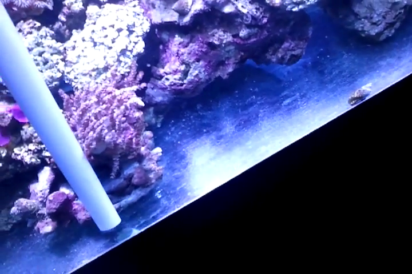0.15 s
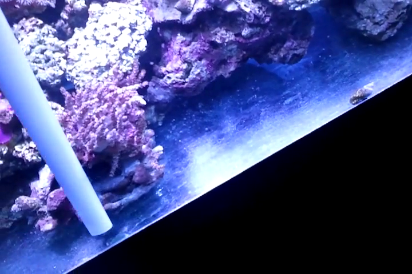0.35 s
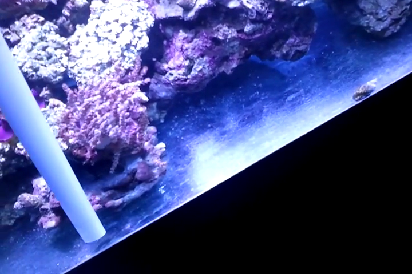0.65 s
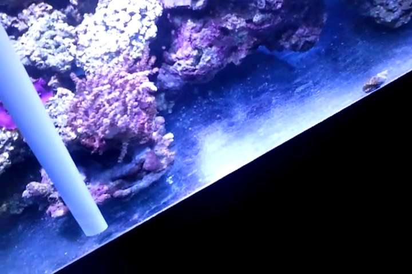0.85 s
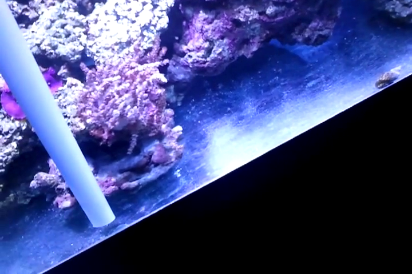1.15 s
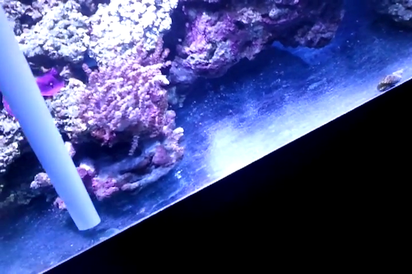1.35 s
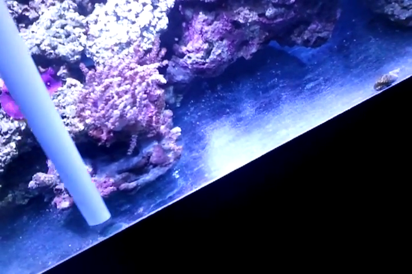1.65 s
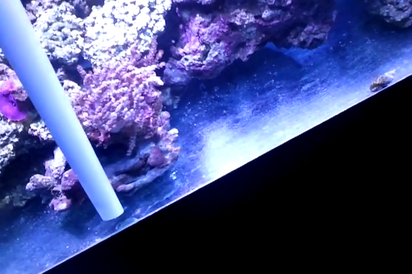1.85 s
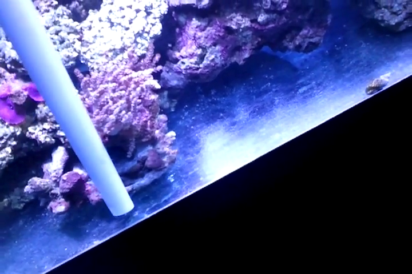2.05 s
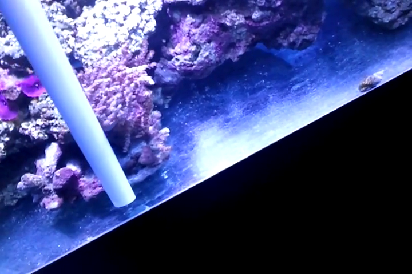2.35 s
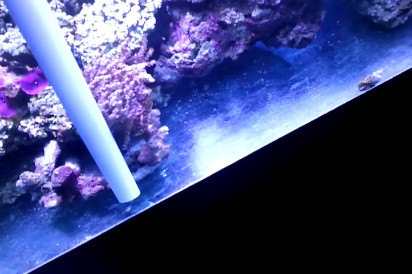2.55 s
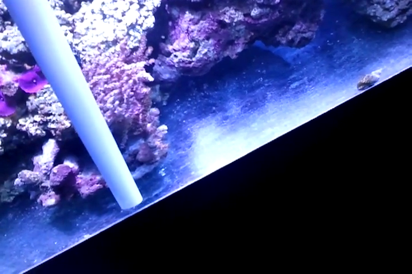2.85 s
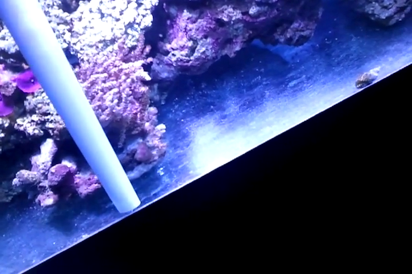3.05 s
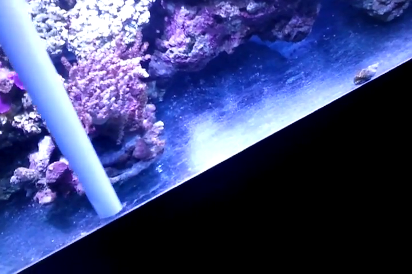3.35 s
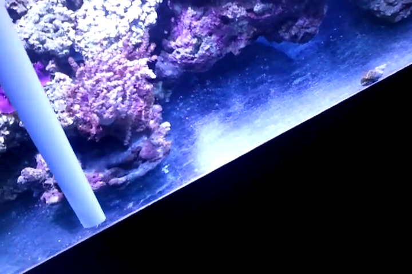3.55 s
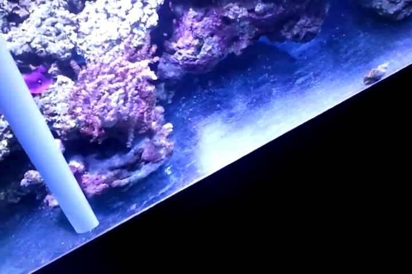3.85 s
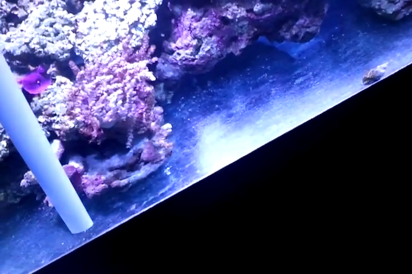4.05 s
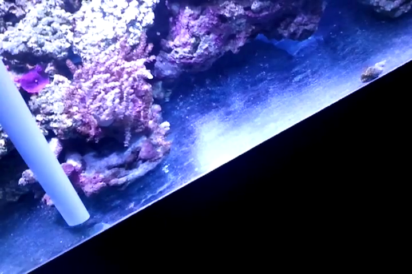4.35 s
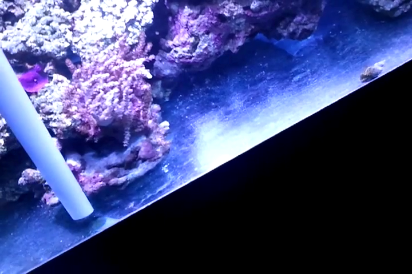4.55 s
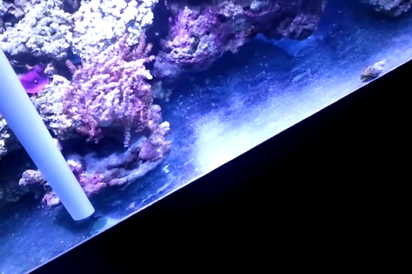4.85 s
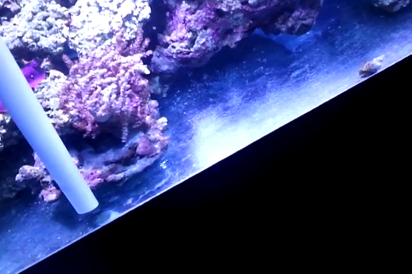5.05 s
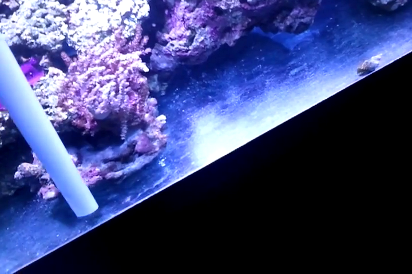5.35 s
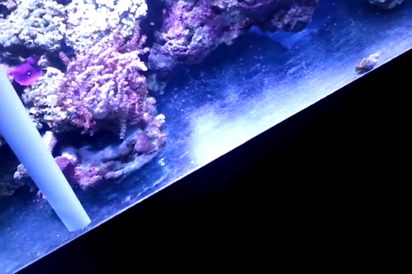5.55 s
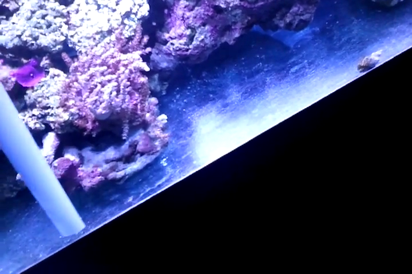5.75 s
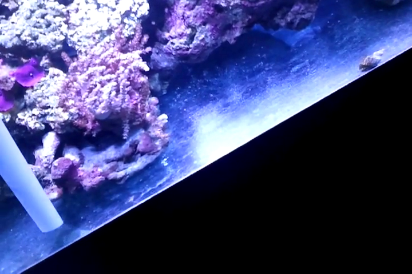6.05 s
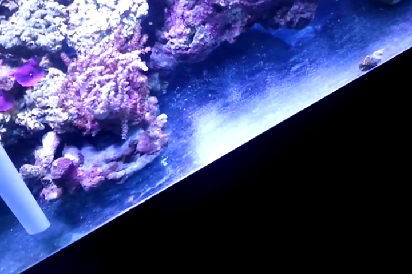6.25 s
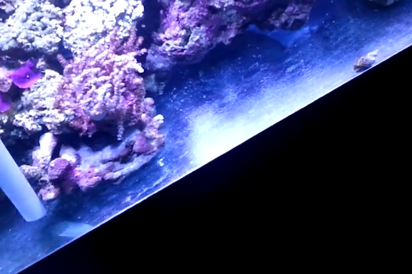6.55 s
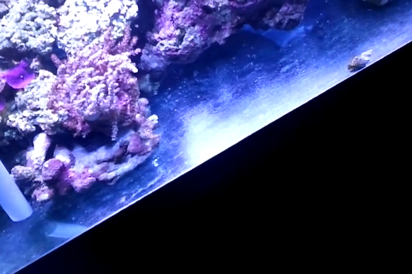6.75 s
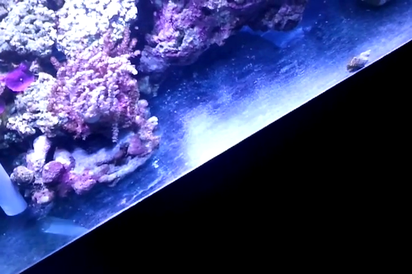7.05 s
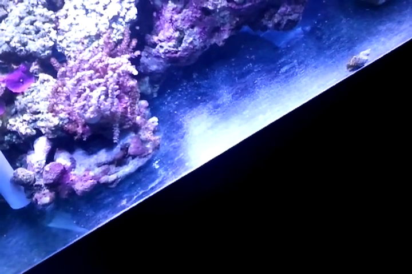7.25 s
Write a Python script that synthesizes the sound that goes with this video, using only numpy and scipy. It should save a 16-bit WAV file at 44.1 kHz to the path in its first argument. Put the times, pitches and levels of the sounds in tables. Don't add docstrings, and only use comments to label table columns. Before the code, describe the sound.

Water drains steadily from an aquarium through a tube, trickling and bubbling over a pump hum, with handling bumps and one firm thump near the end.

```python
import sys
import numpy as np
from scipy import signal
from scipy.fft import rfft, irfft
from scipy.io import wavfile
from scipy.ndimage import uniform_filter1d

SR = 44100
rng = np.random.default_rng(int(sys.argv[2]) if len(sys.argv) > 2 else 0)


def how_loud(loudness_db):
    steps = np.asarray(loudness_db, float) / 20
    return 10 ** steps


def transcribe(u):
    v = np.clip(np.atleast_2d(u).T, -1, 1)
    q = np.round(v * 32767).astype(np.int16)
    wavfile.write(sys.argv[1], SR, q)


N = 325670


def evened(x):
    return x / np.sqrt(np.mean(x ** 2) + 1e-20)


def curve(rows):
    return np.interp(np.arange(N) / SR, *np.transpose(rows))


def add(mix, start_s, sound):
    part = mix[round(start_s * SR):][:len(sound)]
    part += sound[:len(part)]


def bandpass(x, low_hz, high_hz):
    sos = signal.butter(2, [low_hz, high_hz], "bandpass", fs=SR, output="sos")
    return signal.sosfilt(sos, x)


def wander(hz, count):
    rate = 40
    steps = int(N / SR * rate) + 2
    spectrum = rfft(rng.standard_normal((count, steps)))
    spectrum /= 1 + (np.fft.rfftfreq(steps, 1 / rate) / hz) ** 2
    slow = irfft(spectrum, steps)
    at = np.arange(N) / SR * rate
    return [np.interp(at, np.arange(steps), evened(v - v.mean())) for v in slow]


def ping(db, hz, cycles, rise=0.0067):
    t = np.arange(int(cycles / hz * SR) + 8) / SR
    age = t * hz / cycles
    onset = 1 - np.exp(-t * hz / 0.6)
    return how_loud(db - 60 * age) * onset * np.sin(2 * np.pi * hz * t * (1 + rise * age))


# pitch_hz [Hz], level_db [dB per Hz]
WASH_SPECTRUM = [(22, -5), (45, -8), (80, -9), (110, -4), (190, -0.2), (280, 0), (350, -8), (470, -6.5),
                 (680, -9.5), (900, -7), (1300, -17.5), (1800, -15.5), (3000, -21), (6200, -24)]
# pitch_hz [Hz], width_hz [Hz], level_db [dB]
ROOM_MODES = [(107, 22, 0.5), (165, 11, 4.5), (216, 13, 3), (270, 11, -3), (261, 14, -3.5),
              (465.6, 17, 7.5), (591, 14, 4.5), (626, 3.3, -1.5), (722, 24, 3), (847, 52, -4.5),
              (912, 7.7, 2.5), (914, 20, -2.5), (927, 11, -2.5), (1050, 9.1, 1.5), (1206, 17, 3.5),
              (1306, 140, 5), (1360, 16, 1), (2680, 290, 3)]
# time_s [s], level_db [dB]
STREAM_STRENGTH = [(0, -0.7), (.8, -0.55), (1.3, -0.5), (1.7, -0.5), (2.3, -0.5), (3.05, 0), (3.5, -1),
                   (4.5, -1), (5.5, -0.5), (6.2, 0.5), (6.6, -1.7), (7.39, -2)]
WASH_DB = -37


def wash():
    frames, hz = N // 128 + 6, np.fft.rfftfreq(512, 1 / SR)
    real, imag, patches = rng.standard_normal((frames, 257, 3)).T
    patches = uniform_filter1d(patches, size=14, axis=0)
    patches = evened(uniform_filter1d(patches, size=12, axis=1))
    flicker = evened(uniform_filter1d(rng.standard_normal(frames), size=8))
    field_db = np.clip(hz / 4000, .2, 1)[:, None] * (.8 * patches + .8 * flicker)
    white = signal.istft((real + 1j * imag) * how_loud(field_db), nperseg=512, noverlap=384)[1][:N]
    fine = np.fft.rfftfreq(N, 1 / SR)
    modes_db = sum(db / (1 + (2 * (fine - mode_hz) / width) ** 2) for mode_hz, width, db in ROOM_MODES)
    f, level_db = np.transpose(WASH_SPECTRUM)
    colour_db = np.interp(np.log(fine + 1), np.log(f + 1), level_db) + modes_db
    colour = how_loud(colour_db) * (fine > 12) * (fine < 8000)
    return how_loud(WASH_DB) * evened(irfft(rfft(white) * colour, N)) * how_loud(curve(STREAM_STRENGTH))


# start_s [s], level_db [dB peak], pitch_hz [Hz], t60_s [s]
BUBBLES = [(.5362, -37, 3920, 0.019), (.6049, -35, 3570, .018), (.8283, -38, 3760, .02),
           (.9645, -30, 2210, 0.019), (1.145, -35, 2290, 0.026), (1.2115, -35, 2250, 0.015),
           (1.476, -40, 2270, 0.032), (1.5246, -39, 3600, .018), (1.6374, -37, 6770, .028),
           (1.645, -34, 2360, .02), (1.722, -32, 3700, .02), (1.743, -32.5, 2290, 0.024),
           (1.809, -41, 2510, .028), (1.829, -41, 3330, 0.034), (1.608, -41, 3700, .03),
           (3.565, -39, 2270, .025), (3.531, -37, 2650, .015), (3.485, -38, 2580, .015),
           (3.47, -36, 3700, .02), (6.7, -37, 2100, .018), (2.0325, -34, 2250, .015),
           (2.045, -37, 1940, .015), (2.0555, -32.5, 2740, 0.011), (2.48, -36, 2770, .028),
           (3.073, -41, 3630, .02), (3.1, -35, 1940, .018), (3.122, -38, 2550, .028),
           (3.3173, -30.5, 4140, .017), (3.3676, -35, 3770, .022), (3.6738, -34, 3740, .018),
           (3.697, -40, 4130, .018), (3.7065, -37, 3670, .018), (3.9005, -37, 3670, .018),
           (3.749, -32.5, 2260, 0.028), (3.994, -36.5, 6720, .015), (4.44, -33, 2170, .018),
           (4.451, -35, 2480, 0.022), (4.5233, -32, 2680, .018), (4.7175, -40, 3530, .015),
           (4.8945, -37, 2770, 0.014), (5.498, -40, 4890, .028), (5.6282, -39.5, 3420, 0.02),
           (5.733, -33.5, 2770, .022), (6.25, -34.5, 1890, .028), (6.257, -40, 6000, 0.025),
           (6.6985, -41.5, 3580, .015)]
# start_s [s], level_db [dB peak], pitch_hz [Hz]
GULPS = [(1.705, -36, 1106), (1.814, -38, 1420), (1.859, -34, 1267), (1.963, -40.5, 1360),
         (2.718, -40, 1216), (3.078, -31, 1020), (3.309, -33, 1240), (3.441, -34.5, 1265),
         (3.69, -35, 1276), (4.13, -32.5, 1250), (4.249, -35, 1280), (4.278, -31, 1250), (5.552, -33, 1240),
         (5.897, -35, 1220)]
BUBBLE_DB, GULP_CYCLES = -2.5, 77


def bubbles():
    out = np.zeros(N)
    for start_s, db, hz, t60_s in BUBBLES:
        add(out, start_s, ping(db + BUBBLE_DB, hz, hz * t60_s))
    for start_s, db, hz in GULPS:
        add(out, start_s, ping(db, hz, GULP_CYCLES))
    return out


# start_s [s], level_db [dB peak], pitch_hz [Hz]
SPLASHES = [(0.1469, -28, 3520), (0.1568, -35, 5730), (1.4144, -29, 4320), (1.47, -26.5, 4420),
            (1.5722, -27, 6100), (1.6652, -32.5, 5950), (1.506, -33.5, 6330), (1.652, -31.5, 6280),
            (2.1215, -30, 7250), (2.3924, -35.5, 6150), (2.5126, -32, 6400), (3.022, -34, 6000),
            (3.0948, -26, 6480), (3.5708, -35.5, 5700), (3.579, -28, 6120), (3.729, -28.5, 7220),
            (1.8795, -32.5, 6430), (3.992, -35, 5030), (4.284, -28.5, 5210), (4.3835, -29, 5650),
            (4.4145, -33, 4780), (4.8536, -31, 5460), (4.8554, -30.5, 3650), (4.8927, -28, 5840),
            (5.396, -38, 3620), (5.497, -29.5, 6050), (5.5247, -26.5, 6530), (5.5925, -26.5, 6440),
            (5.805, -30, 4660), (6.062, -33.5, 3930), (6.2538, -42, 4970), (6.5157, -29, 6730),
            (6.8156, -27.5, 6400),
            (0.973, -37.5, 5000), (3.1767, -35, 4200), (4.149, -32.5, 4500), (4.579, -34, 4440),
         (4.744, -39, 6640), (5.3958, -32, 3000), (6.759, -38, 6040), (0.8635, -31.5, 5880),
         (5.72, -32.5, 6330), (6.9516, -30, 4100), (7.029, -25, 6230),
            (.042, -35, 4700), (.171, -35, 3950), (.826, -39, 6630), (.993, -35, 6770),
               (1.416, -35, 3570), (1.419, -35.5, 6370), (1.479, -34, 3510), (1.57, -38.5, 4380),
               (1.582, -34, 6300), (1.653, -35, 4510), (2.222, -31, 7250), (2.314, -36, 6880),
               (3.132, -36, 4700), (3.139, -35, 7000), (3.377, -37, 5070), (3.656, -30, 7300),
               (3.674, -38, 4820), (3.74, -34, 7000), (3.961, -30.5, 7380), (3.992, -37.5, 5870),
               (4.282, -34, 4070), (4.293, -38.5, 3300), (4.464, -34, 6760), (4.854, -33, 7080),
               (4.866, -36, 3270), (4.866, -37, 5500), (5.201, -37, 6640), (5.23, -34.5, 4920),
               (5.267, -40, 5830), (5.407, -34, 3630), (5.522, -26, 7000), (5.738, -36, 6060),
               (5.816, -35, 7200), (6.106, -35, 4010), (6.137, -36.5, 6640), (6.154, -37, 3880),
               (6.268, -34, 4890), (6.827, -39, 5510), (6.961, -37, 5070), (7.04, -31, 6650)]
RING_T60_S, RING_DB, CLICK_DB = 0.0058, -5.5, -4.5
BAND_LOW, BAND_HIGH = .8, 1.16


def splashes():
    out, click = np.zeros(N), signal.unit_impulse(400)
    for start_s, db, hz in SPLASHES:
        snap = bandpass(click, hz * BAND_LOW, hz * BAND_HIGH)
        add(out, start_s, how_loud(db + CLICK_DB) * snap / abs(snap).max())
        add(out, start_s, ping(db + RING_DB, hz, hz * RING_T60_S))
    return out


def fizz(per_s=85, count=24):
    out = np.zeros(N)
    struck = rng.random(N) < per_s / SR
    size = how_loud(4.5 * np.minimum(rng.exponential(1, N), 2.1)) * struck
    kind = rng.integers(0, count, N)
    cycles = rng.choice([4, 10, 30], count)
    for k, hz in enumerate(np.geomspace(1100, 7000, count)):
        out += signal.oaconvolve(size * (kind == k), ping(-49.0, hz, cycles[k]))[:N]
    return out


# delay_s [s], level_db [dB]
ECHOES = [(.0012, -5), (.0023, -4), (.0036, -6), (.0075, -14), (.012, -4.5), (.0155, -10), (.021, -11),
          (.027, -12)]


def room(x, t60_s=.22, tail_db=-5.5):
    taps = np.zeros(SR // 4)
    at = np.arange(300, len(taps) - 22, 22)
    at = at + rng.integers(0, 22, len(at))
    taps[at] = rng.choice([-1., 1.], len(at)) * how_loud(-60 * at / SR / t60_s)
    taps *= how_loud(tail_db) / np.linalg.norm(taps)
    taps[0] = 1
    for delay_s, db in ECHOES:
        taps[round(delay_s * SR)] += how_loud(db)
    return signal.oaconvolve(x, taps)[:N]


# time_s [s], level_db [dB]
PUMP_SWELL = [(0, 3), (1.1, -0.5), (1.65, 0.5), (2.3, -0.5), (3.4, -2.5), (4.2, 2), (4.8, 2.5), (5.3, -1),
              (6.3, 0.5), (7.0, 4.5), (7.39, 0.5)]
# middle_s [s], depth_db [dB]
PUMP_NULLS = [(0.12, 14), (1.5, 16), (1.949, 5), (3.55, -1), (3.76, -2), (5.22, 12), (5.7, 4), (2.88, -5.5),
              (2.62, -2), (2.14, 3), (3.22, 5), (6.65, 5), (7.6, 2), (5.05, 9), (5.94, -4), (7.1, 6.5)]
NULL_S = 0.054


def pump_sway_db():
    t = np.arange(N) / SR
    dips_db = sum(db * np.exp(-((t - middle_s) / NULL_S) ** 2) for middle_s, db in PUMP_NULLS)
    return curve(PUMP_SWELL) - dips_db


# time_s [s], speed_hz [turns per s]
RETURN_SPEED = [(0.0, 43.797), (0.62, 43.856), (1.23, 43.898), (1.85, 43.896), (2.46, 43.906),
                (3.08, 43.86), (3.7, 43.865), (4.31, 43.837), (4.93, 43.85), (5.54, 43.81), (6.16, 43.777),
                (6.77, 43.665), (7.39, 43.674)]
PUMP_SPEED = [(0.0, 42.772), (0.62, 42.721), (1.23, 42.707), (1.85, 42.787), (2.46, 42.71), (3.08, 42.629),
              (3.7, 42.615), (4.31, 42.596), (4.93, 42.543), (5.54, 42.584), (6.16, 42.587), (6.77, 42.604),
              (7.39, 42.634)]
FAN_SPEED = [(0.0, 36.06), (0.62, 36.03), (1.23, 36.038), (1.85, 36.06), (2.46, 36.064), (3.08, 35.97),
             (3.7, 35.937), (4.31, 35.985), (4.93, 35.994), (5.54, 36.0), (6.16, 35.966), (6.77, 36.008),
             (7.39, 36.098)]
WHINE_SPEED = [(0.0, 146.913), (0.62, 146.921), (1.23, 147.012), (1.85, 146.961), (2.46, 146.888),
               (3.08, 146.764), (3.7, 147.009), (4.31, 147.032), (4.93, 146.989), (5.54, 146.888),
               (6.16, 146.981), (6.77, 146.957), (7.39, 146.864)]
# order [multiple of shaft speed], level_db [dB rms]
RETURN_ORDERS = [(3, -60.2), (5, -55.9), (6, -56.4), (7, -53.5), (9, -66.7), (10, -61.3), (14, -54.0),
                 (15, -57.7), (16, -58.2), (18, -50.5), (19, -51.2), (20, -54.8), (21, -59.1), (22, -49.1),
                 (23, -55.6), (24, -60.0), (25, -66.5), (26, -54.4), (29, -70.0), (32, -63.4), (33, -56.5),
                 (35, -62.9), (36, -67.7), (37, -70.5), (42, -72.4), (43, -69.1)]
PUMP_ORDERS = [(4, -49.2), (6, -51.0), (7, -41.9), (20, -47.7), (21, -62.4), (28, -63.9), (32, -57.4),
               (35, -72.6), (36, -62.0), (39, -68.9), (40, -70.1), (44, -71.2), (47, -74.8), (48, -61.7),
               (52, -74.0), (54, -76.1), (56, -77.1), (58, -71.5), (60, -62.4)]
FAN_ORDERS = [(16, -56.3), (20, -60.8), (24, -58.8), (26, -50.4), (27, -62), (28, -58), (38, -65)]
WHINE_ORDERS = [(5, -63.3), (6, -61.2), (7, -49.7), (9, -68.9), (10, -68.3), (12, -65.6), (13, -64.6)]
MAINS_HZ, MAINS_DB, MOTORS_DB, WAVER_DB = 119.1, -46.5, -0.5, 1.15
BLADES, THROB_S = 7, .057


def hum():
    motors = ((RETURN_SPEED, RETURN_ORDERS), (PUMP_SPEED, PUMP_ORDERS),
              (FAN_SPEED, FAN_ORDERS), (WHINE_SPEED, WHINE_ORDERS))
    t = np.arange(N) / SR
    waver_db = WAVER_DB * np.array(wander(1.4, count=8))
    sway_db = pump_sway_db()
    out = how_loud(MAINS_DB + waver_db[0]) * np.sin(2 * np.pi * MAINS_HZ * t)
    for speed, orders in motors:
        turns = np.cumsum(curve(speed)) / SR
        turns -= turns[round(THROB_S * SR)]
        for (order, db), start in zip(orders, rng.random(len(orders))):
            level_db = waver_db[int(order) % len(waver_db)]
            if speed is PUMP_SPEED and order == BLADES:
                level_db = sway_db
            if order == BLADES:
                start = 0
            out += how_loud(db + MOTORS_DB + level_db) * np.cos(2 * np.pi * (order * turns + start))
    return np.sqrt(2) * out


# start_s [s], level_db [dB peak], pitch_hz [Hz], t60_s [s]
TUBE_KNOCKS = [(1.374, -20.5, 288, .13), (1.376, -29, 518, .06), (1.388, -28, 470, 0.09),
               (1.397, -27, 270, 0.089), (1.438, -36, 487, .08), (1.404, -23, 287, 0.14),
               (1.412, -31, 453, 0.052), (1.426, -36, 508, 0.092), (1.428, -28, 302, 0.1),
               (1.444, -29, 260, 0.079), (1.549, -27.5, 260, 0.099), (1.573, -31, 240, 0.087)]
# start_s [s], level_db [dB peak], pitch_hz [Hz], t60_s [s]
DULL_KNOCKS = [(1.2, -25, 143, 0.062), (3.5, -34, 220, 0.082), (6.9, -28, 119, 0.22), (4.9, -34, 132, 0.13),
               (6.282, -30, 150, 0.056), (6.351, -33, 103, 0.13), (6.544, -29, 153, 0.21),
               (6.585, -29, 300, 0.18), (4, -35, 270, 0.12), (5.8, -32, 520, 0.091), (6.521, -26, 280, 0.1),
               (2.1, -29, 245, 0.19), (2.96, -28.5, 220, 0.1), (7.189, -24.5, 127, 0.14),
               (6.14, -30, 150, .08), (6.335, -32, 280, 0.072), (6.545, -26, 200, 0.066),
               (7.7, -29, 134, .08), (0.89, -27, 120, 0.062), (1.445, -26, 150, .07),
               (1.51, -29, 105, 0.051), (1.65, -34, 120, 0.064), (1.72, -28, 170, 0.1),
               (6.238, -31.5, 278, 0.062), (5.5, -32.5, 670, .06), (6.9, -34, 675, .06),
               (6.118, -35, 687, .06), (6.14, -32, 460, 0.079), (4.8, -33, 300, .1), (6.1, -28, 170, .07),
               (3.2, -27, 400, 0.046), (2.57, -32, 300, 0.08), (3.2, -26, 298, .12), (1.8, -31, 380, .06),
               (4.437, -32, 462, 0.076), (4.7, -26.5, 162, .12)]
# start_s [s], level_db [dB peak],
# pitch_hz [Hz], t60_s [s]
THUMPS = [(6.033, -14, 235, .04), (6.034, -21, 125, .08), (1.045, -22, 150, .07), (1.11, -23, 165, .08),
          (1.145, -24, 140, .07), (.97, -25, 160, .07), (1.255, -24, 125, .07), (2.945, -25, 200, .08)]


def knocks():
    out = np.zeros(N)
    for start_s, db, hz, t60_s in DULL_KNOCKS + TUBE_KNOCKS + THUMPS:
        add(out, start_s, ping(db, hz, hz * t60_s, rise=-0.051))
    return out


# peak_s [s], level_db [dB peak], pitch_hz [Hz]
BUMPS = [(0.912, -36, 34), (0.939, -30.5, 75), (0.967, -25, 36.8), (1.004, -28, 45), (1.051, -25, 51),
         (1.097, -28, 53), (1.125, -29, 55.5), (1.175, -29.5, 41), (1.205, -32, 56), (1.262, -30, 37.4),
         (1.436, -30, 44), (1.514, -34, 61.3), (1.553, -33, 36.6), (1.607, -43, 43), (1.647, -24.5, 41.7),
         (1.701, -33, 32), (1.743, -38.5, 125), (4.787, -36, 43.5), (4.846, -26, 26.1), (6.11, -30, 114),
         (7.232, -32.5, 101)]


def bumps():
    out = np.zeros(N)
    t = np.arange(-.05, .05, 1 / SR)
    for (peak_s, db, hz), start in zip(BUMPS, rng.random((len(BUMPS), 1))):
        lump = np.sin(2 * np.pi * (hz * t + start))
        lump = lump + 0.28 * np.sin(2 * np.pi * (2.6 * hz * t + 3 * start))
        add(out, peak_s - .05, how_loud(db) * lump * np.exp(-(t / 0.011) ** 2))
    return out


# middle_s [s], half_length_s [s], level_db [dB]
BUSY_HAND = [
    (1.08, 0.26, 9),
    (1.58, 0.17, 11.5),
    (6.3, 0.4, 2),
    (7.2, .1, -3),
]


def rumble():
    t = np.arange(N) / SR
    low = bandpass(rng.standard_normal(N), 22, 85)
    busy_db = sum(db * np.exp(-((t - middle_s) / half_s) ** 4) for middle_s, half_s, db in BUSY_HAND)
    unsteady_db = 2.0 * np.clip(wander(4.2, count=1)[0], -2, 1.5)
    return evened(low) * how_loud(-53.5 + busy_db + unsteady_db)


def scene():
    water = room(bubbles() + splashes() + fizz()) + wash()
    hand = knocks() + bumps() + rumble()
    return (water + hum() + hand)[None]


# pitch_hz [Hz], level_db [dB]
MIC_RESPONSE = [(0, 0), (5400, 0), (6350, 2), (6650, -1), (7000, -6.5), (7400, -12), (7600, -21),
                (7680, -90), (22050, -100)]


def microphone(dry):
    f, level_db = np.transpose(MIC_RESPONSE)
    fine = np.linspace(0, SR / 2, 2049)
    response = how_loud(np.interp(fine, f, level_db))
    taps = signal.firwin2(1023, fine, response, window=("kaiser", 9), fs=SR)
    hiss = evened(bandpass(rng.standard_normal(N), 12300, 14800))
    return signal.oaconvolve(dry, taps[None], "same") + how_loud(-101) * hiss


# top_s [s], level_db [dB]
GAIN_LIFTS = [(-0.0, -12.49), (1.1, -12.1), (1.49, -10.91), (1.72, -11.03), (2.48, -13.62), (2.64, -13.64),
              (2.99, -12.36), (3.38, -13.38), (3.66, -14.09), (3.95, -13.86), (4.37, -12.95),
              (4.77, -13.16), (5.28, -12.99), (5.65, -12.67), (6.21, -9.93), (6.97, -12.86), (7.22, -13.14)]
REST_DB, CLIMB_DB_PER_S, SAG_DB_PER_S, SOFT_S = -14.94, 20, 5.47, .08


def camera_gain_db():
    t = np.arange(N) / SR
    tents = [db - np.maximum(SAG_DB_PER_S * (t - top_s), CLIMB_DB_PER_S * (top_s - t))
             for top_s, db in GAIN_LIFTS]
    gain_db = np.maximum(np.max(tents, axis=0), REST_DB)
    return uniform_filter1d(gain_db, size=round(SOFT_S * SR), mode="nearest")


def top_cut(x):
    return signal.sosfilt(signal.butter(12, 17200, fs=SR, output="sos"), x)


def record(dry):
    offset = .2
    mix = (microphone(dry) / offset - 1) * how_loud(camera_gain_db())
    return top_cut(mix)


dry = scene()
out = record(dry)
transcribe(out)
```